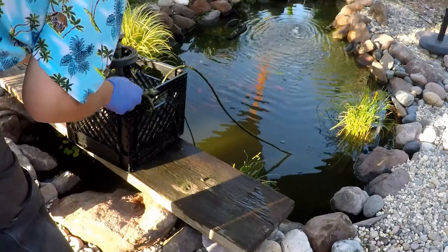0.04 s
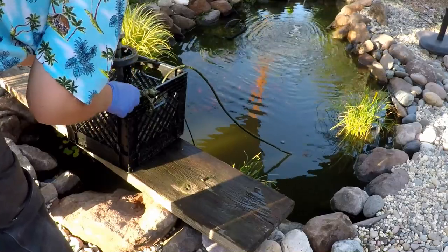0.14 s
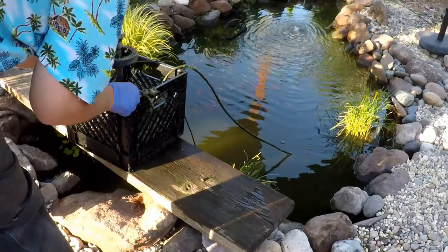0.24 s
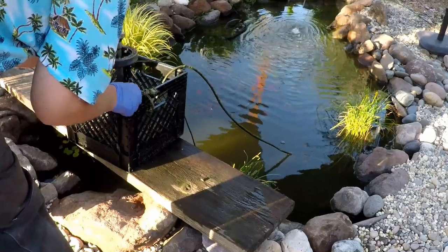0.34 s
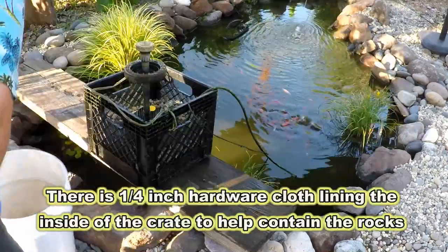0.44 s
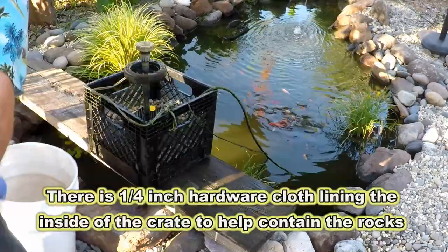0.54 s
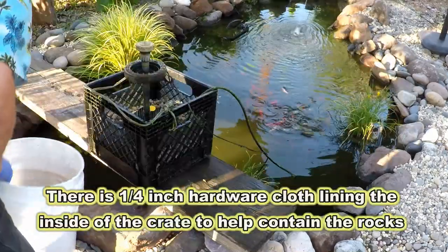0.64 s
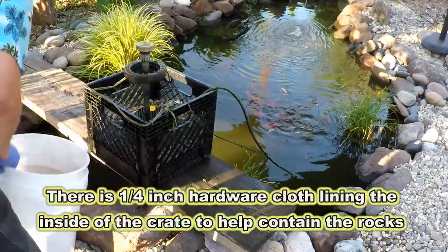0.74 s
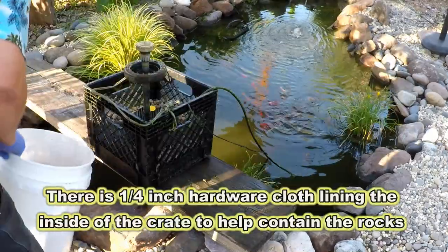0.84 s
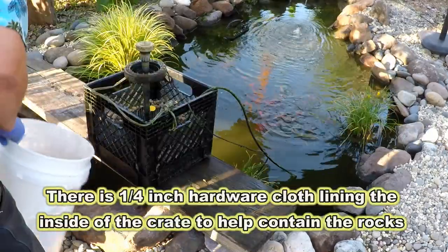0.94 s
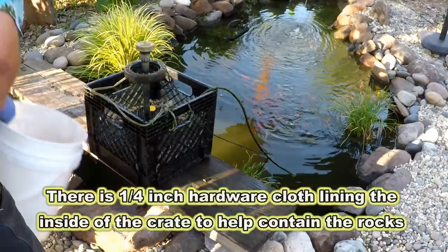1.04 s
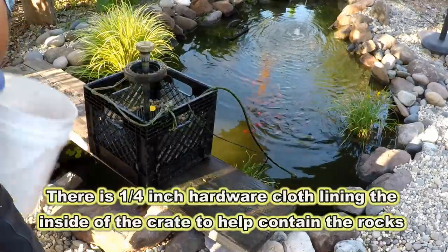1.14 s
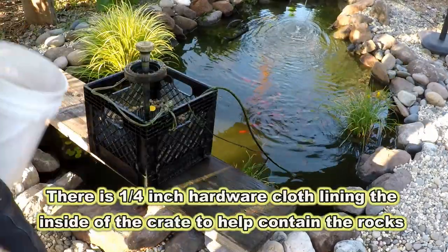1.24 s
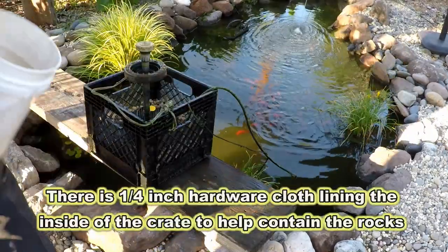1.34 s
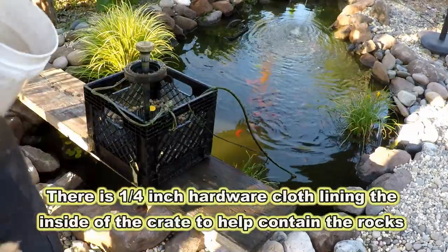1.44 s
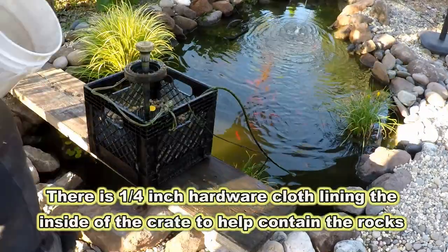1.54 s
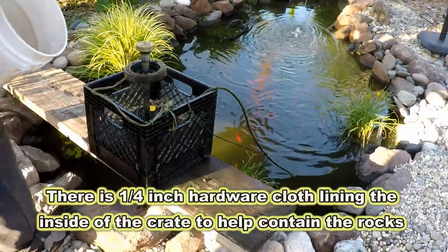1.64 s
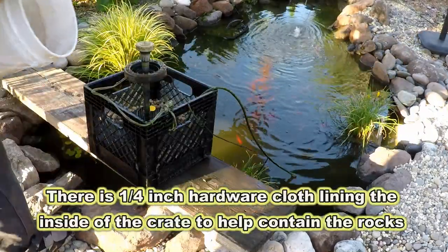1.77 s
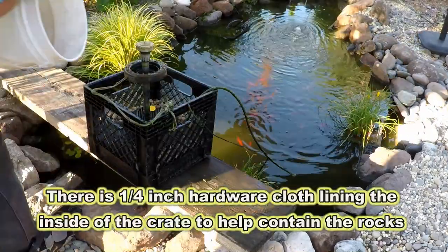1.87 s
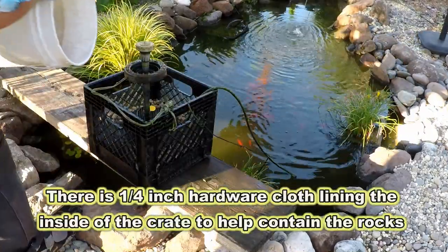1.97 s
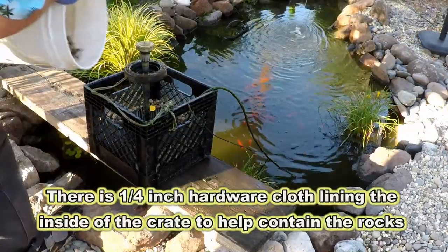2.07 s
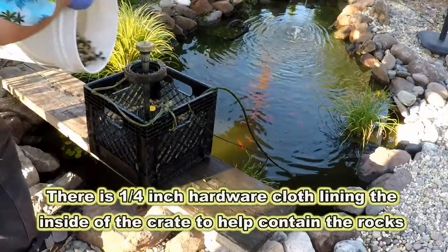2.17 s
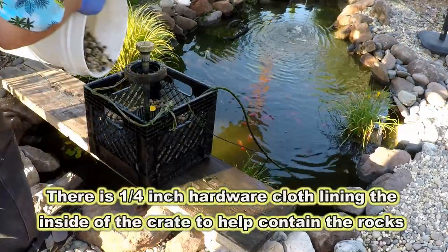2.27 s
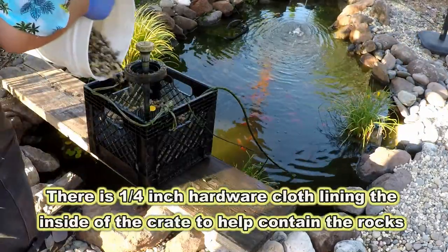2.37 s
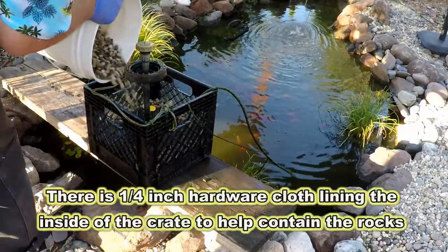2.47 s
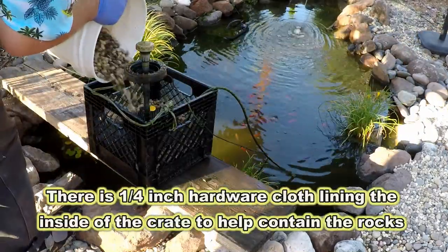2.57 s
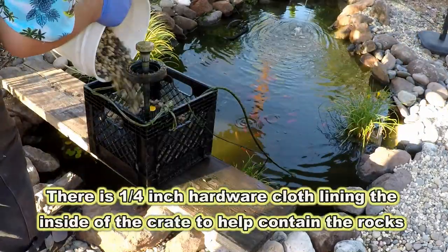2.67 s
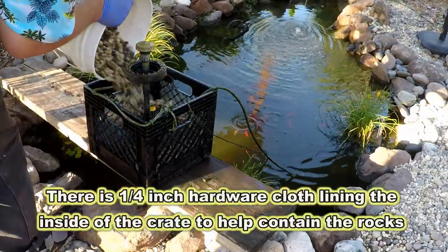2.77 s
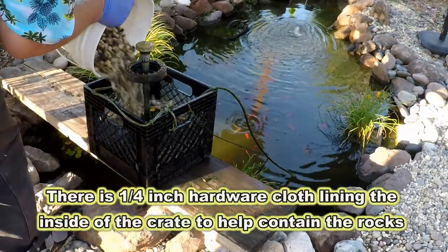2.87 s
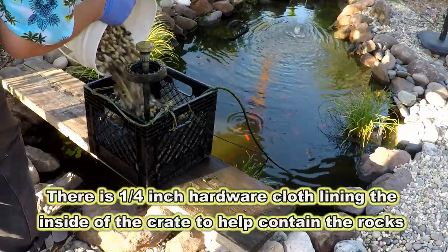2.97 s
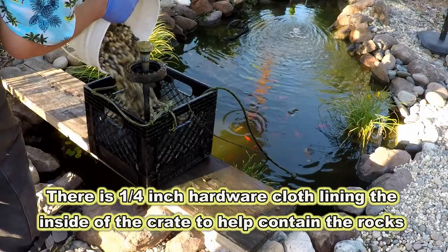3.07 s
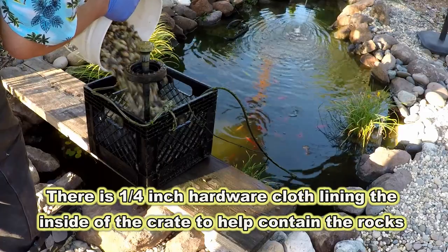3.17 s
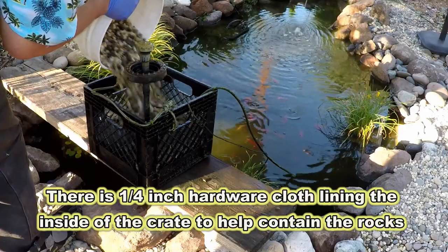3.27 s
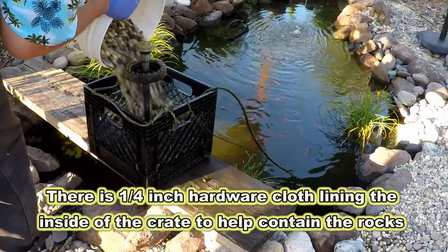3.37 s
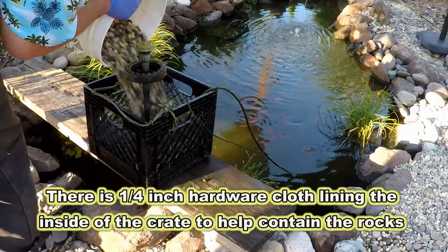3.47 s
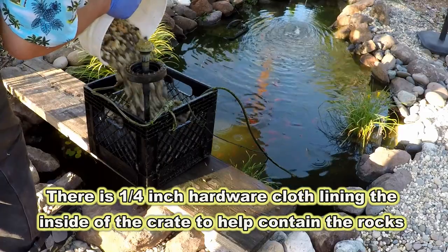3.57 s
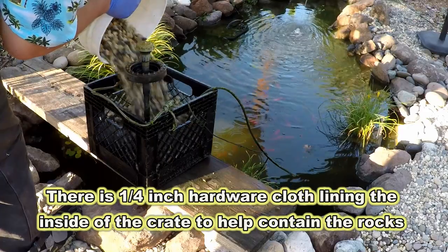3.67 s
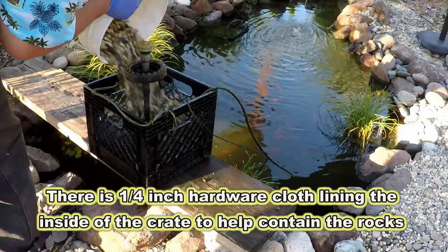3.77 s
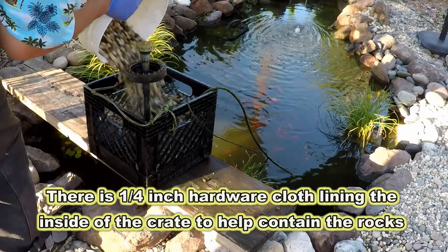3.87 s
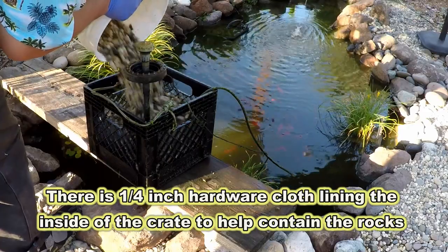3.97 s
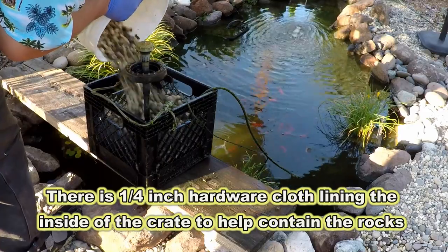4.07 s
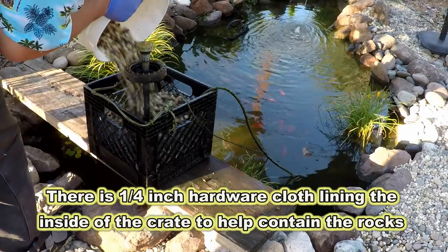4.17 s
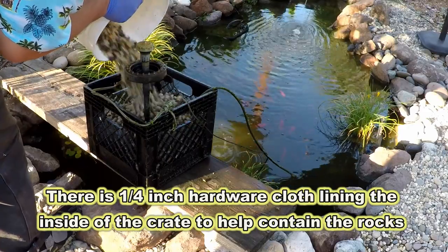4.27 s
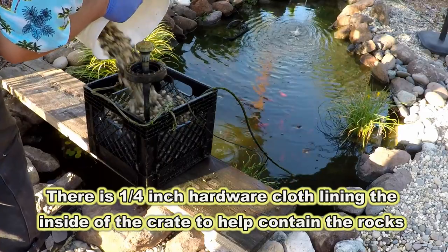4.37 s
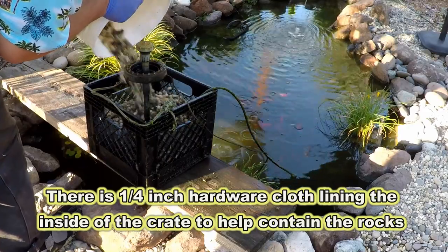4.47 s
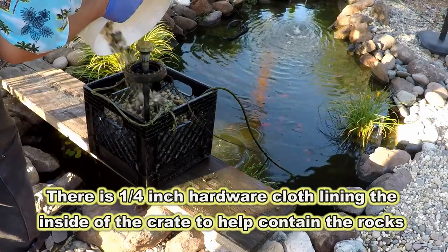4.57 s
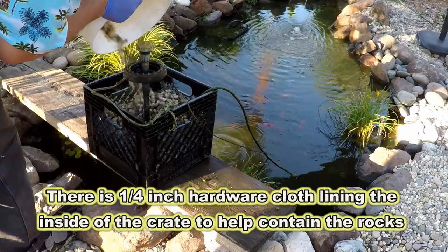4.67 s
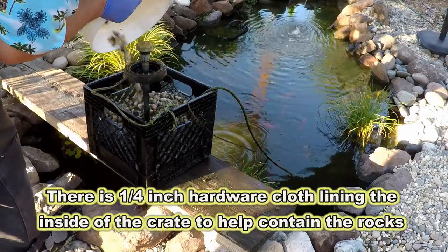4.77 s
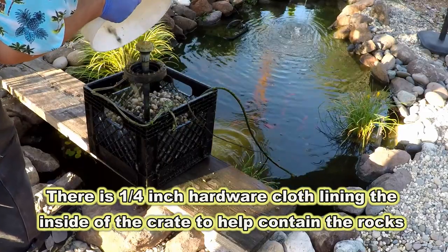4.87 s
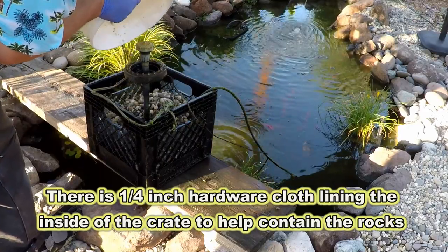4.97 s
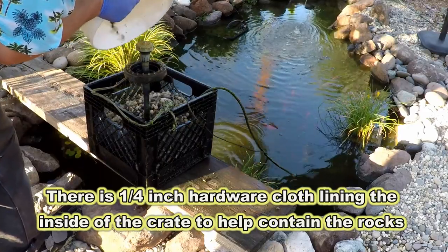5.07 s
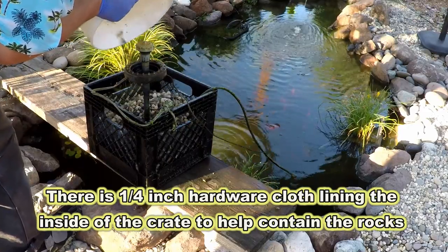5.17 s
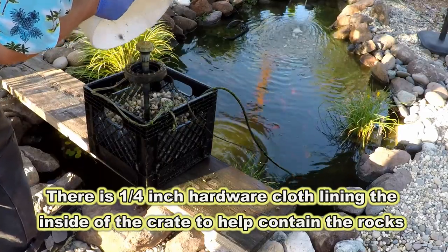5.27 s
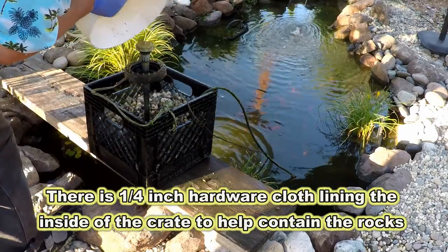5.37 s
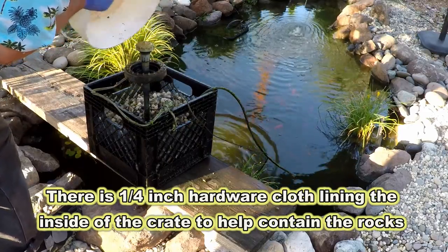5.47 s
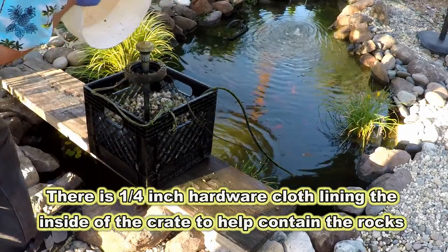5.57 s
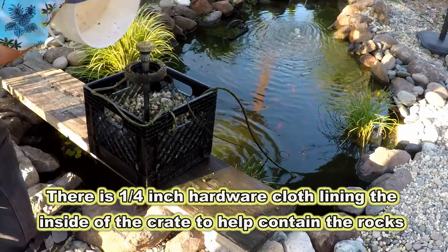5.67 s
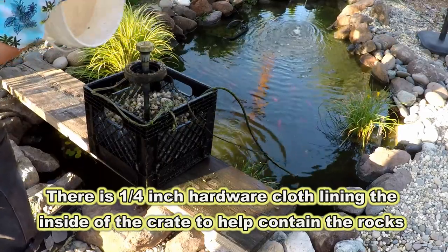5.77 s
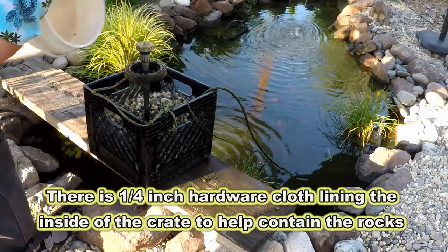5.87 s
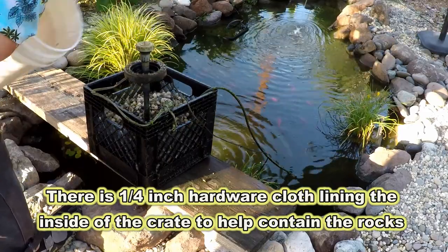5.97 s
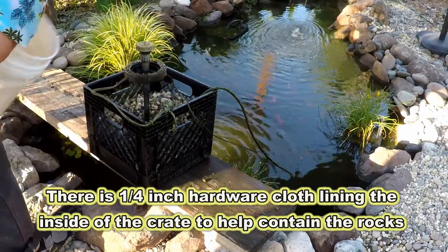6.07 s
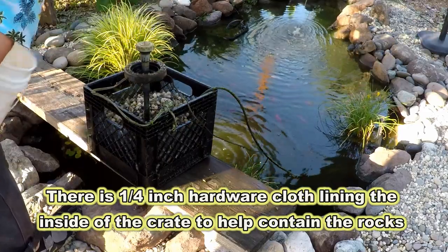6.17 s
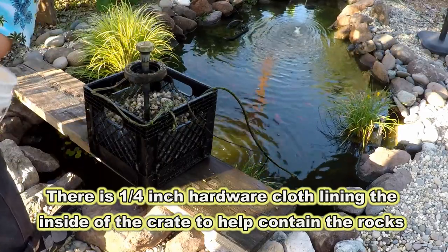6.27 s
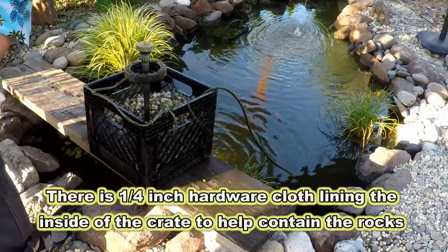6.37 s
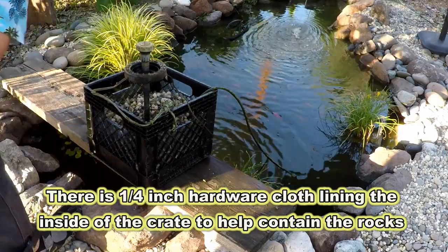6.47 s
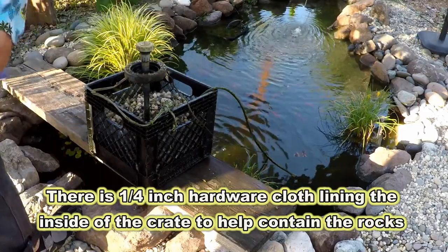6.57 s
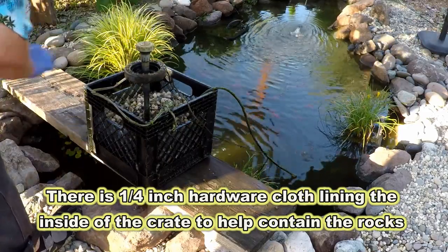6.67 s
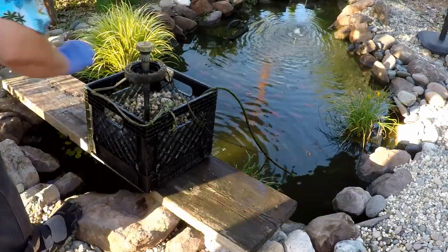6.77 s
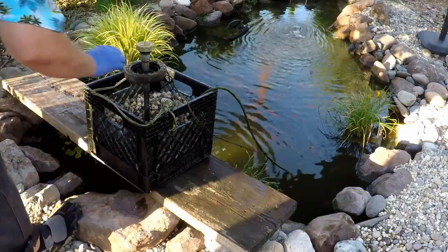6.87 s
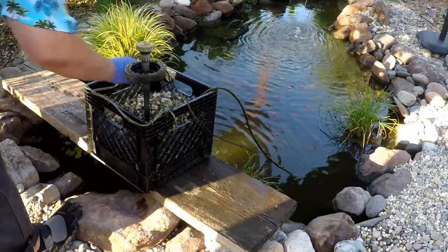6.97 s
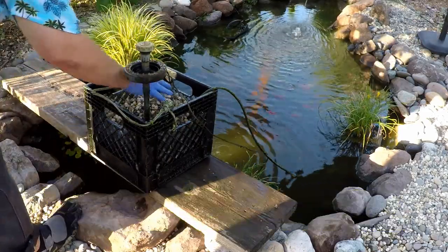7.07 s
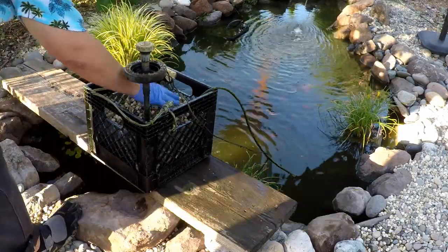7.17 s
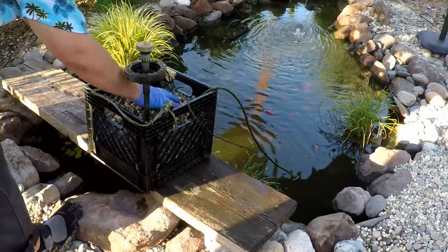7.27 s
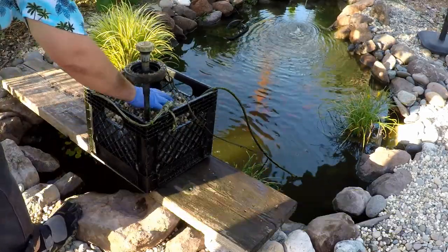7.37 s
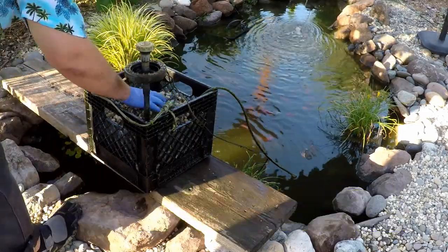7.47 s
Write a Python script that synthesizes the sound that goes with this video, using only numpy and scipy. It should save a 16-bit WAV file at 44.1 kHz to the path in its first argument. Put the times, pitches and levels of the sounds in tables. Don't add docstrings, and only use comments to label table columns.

```python
import sys
import numpy as np
from scipy import signal
from scipy.fft import rfft, irfft, next_fast_len
from scipy.io import wavfile
from scipy.ndimage import uniform_filter1d, map_coordinates

SR = 44100
rng = np.random.default_rng(int(sys.argv[2]) if len(sys.argv) > 2 else 0)


def master(y):
    cut = np.clip(np.atleast_2d(y).T, -1, 1)
    pcm = np.round(cut * 32767)
    wavfile.write(sys.argv[1], SR, pcm.astype(np.int16))


def decibels_to_gain(level_db):
    exponent = np.asarray(level_db, float) / 20
    return 10 ** exponent


N = 332073

# (frequency [Hz], density [dB per Hz])
FOUNTAIN_COLOUR = [(88, -70), (150, -1), (756, 0), (1160, -6.5), (2300, -12), (3390, -9.5), (4910, -10),
                   (8810, -22.5), (12800, -68), (14900, -22), (15800, -47)]
# (frequency [Hz], density [dB per Hz])
RUMBLE_COLOUR = [(15, -12), (25, -0.5), (69, -0.5), (152, -11.5), (184, -17), (291, -16.5), (450, -28),
                 (580, -53), (990, -120)]

# (time [s], clatter level [dB])
FLOW = [(0, -53.5), (.17, -57), (.33, -59), (1.6, -63), (1.75, -59), (1.84, -55.5), (1.98, -33.5),
        (1.984, -25), (2.25, -30.5), (2.52, -34.5), (2.82, -38), (2.86, -30.5), (3.05, -28.5),
        (4.35, -29.5), (4.88, -37.5), (5.14, -50.5), (5.7, -70.5), (7.42, -65), (7.53, -55)]
# (time of the peak [s], peak level [dB], rise [s], t60 [s])
SLIPS = [(.24, -56, 0.092, 0.17), (0.379, -51.5, 0.019, 1.3), (.48, -72, 0.02, 0.58),
         (.57, -53, 0.092, 0.4), (0.656, -48.5, 0.072, 0.047), (.72, -73, 0.0095, 0.094),
         (0.825, -46, .02, 0.17), (.945, -55.5, .008, 0.15), (1.18, -49.5, 0.039, 0.17),
         (1.38, -57, 0.18, 0.096), (1.792, -37, 0.023, 0.34), (1.857, -42, 0.0027, 0.052),
         (2.549, -30.5, 0.015, 0.19), (2.645, -28, 0.0067, 0.19), (2.685, -28.5, 0.0075, 0.14),
         (2.722, -30.5, 0.005, 0.99), (2.83, -24, 0.0036, 0.063), (2.886, -25, 0.0032, 0.068),
         (5.03, -42.5, 0.049, 1.6), (5.176, -45, 0.01, 0.41), (5.292, -43, 0.011, 0.089),
         (5.337, -46, 0.01, 0.19), (5.42, -50, 0.019, 0.33), (5.482, -41.5, 0.0087, 0.45),
         (5.616, -49.5, 0.023, 0.24), (5.75, -56.5, 0.041, 0.17), (5.95, -59, 0.015, 0.13),
         (6.45, -55.5, 0.025, 1.3), (7.47, -56, 0.056, 3.9)]
# (time [s], surface [0 bucket wall, 1 bare crate, 2 bed of gravel])
LANDING = [(0, 1.55), (.7, 1.37), (1.9, 0.19), (2.4, 0.46), (2.6, 0.58), (2.9, 1.09), (3.5, 1.415),
           (4.2, 1.51), (4.7, 1.65), (4.9, 1.54), (5.3, 1.4), (7.53, 1.58)]
# (frequency [Hz], density [dB per Hz])
SURFACE_COLOURS = [
    [(350, -28.5), (600, -9.5), (676, -6.5), (721, -14), (906, -4.5), (1090, -5), (1300, 2), (1810, -3),
     (2110, -7.5), (2500, -7.5), (2850, -8), (3150, -5), (3450, -8), (3900, -12), (7020, -16), (8000, -23),
     (10400, -50), (17600, -120)],
    [(350, -70.5), (600, -16), (916, -8.5), (1080, -10), (1410, -1), (1930, -0.5), (2200, -1.5), (2680, -4),
     (2860, -2), (3710, -7), (4550, -8), (8000, -27.5), (10400, -69), (17600, -120)],
    [(350, -32.5), (600, -24), (977, 1.5), (1200, -6.5), (1310, 5.5), (1570, -13.5), (2200, 2), (2430, 4),
     (3630, 5.5), (6100, -3), (6650, -6), (8000, -15.5), (10400, 3.5), (17600, -120)],
]
# (time [s], level [dB])
FINE_GRIT = [(0, -6), (.35, -5.5), (.46, -6.5), (.7, -11), (.8, -1.5), (1.3, 3), (1.7, 6), (1.81, 5.5),
             (1.87, 8), (2.0, 1), (3.0, 1), (4.2, 3), (5.1, 2), (5.7, -3.5), (6.3, -3.5), (6.9, -4),
             (7.25, -10), (7.45, 1.5)]
# (time [s], fill [0 empty, 1 half, 2 full], level [dB])
CRATE_FILL = [(0, 1.4, 7.5), (1.7, 1.1, 1), (2.0, 0.23, 1), (2.7, 0.41, 3.5), (3.1, 1.23, 2.5),
              (3.6, 1.3, 5.5), (4, 1.2, 2.5), (4.6, 2.2, 1.5), (5.2, 2.2, 1.5), (5.8, 2.95, -3.5),
              (7.53, 2.3, -3)]
# (frequency [Hz], density [dB per Hz])
CRATE_THUDS = [
    [(100, -69), (170, -17.5), (231, 3), (433, -17.5), (609, 5), (715, -12), (900, 0), (1170, -23),
     (1980, -120)],
    [(120, -42), (200, -12), (264, -2), (348, -1.5), (415, 6), (565, 2.5), (900, -3.5), (1170, 8.5),
     (1980, -120)],
]
# (frequency [Hz], density [dB per Hz])
HALF_FULL_THUD = [(120, -51), (200, -9.5), (300, -0.5), (400, -7.5), (520, 1.5), (640, -0.5), (900, -1),
                  (1170, -3.5), (1980, -120)]
# (frequency [Hz], width [Hz], level [dB])
BUCKET_MOUTH = [(1480, 140, -5)]
# (frequency [Hz], width [Hz], level [dB])
SLOPING_WALL = [(3150, 600, -4)]
# (time [s]), (level [dB])
EMPTYING_S, EMPTY_RING_DB = (2.3, 2.8, 4.1, 4.7), (-8, 0, 0, 8)

# (frequency [Hz], density [dB per Hz])
TICK_COLOUR = [(2000, -120), (3530, 0.0), (6000, -2.5), (7230, -5.0), (8470, -12.5), (10500, -1.0),
               (11900, 0.5), (14700, -7.5), (15400, -8)]
# (frequency [Hz], width [Hz], level [dB])
PLASTIC_WALL = [(565, 110, -11), (1000, 345, 6), (1350, 106, 6.5), (1690, 360, 3.5), (3190, 1040, 4.5),
                (3770, 3070, -2.5)]
# (frequency [Hz], width [Hz], level [dB])
BUCKET_HOLLOW = [(217, 130, -13.5), (501, 35, 0), (765, 110, -11.5)]
# (time [s], peak level [dB], pitch [Hz])
RAKED = [(0.019, -36, 2240), (0.061, -35.5, 3380), (0.096, -40, 2160), (0.193, -44, 1350),
         (0.236, -31.5, 3130), (0.288, -39, 2930), (0.373, -42, 3750), (0.464, -33, 1770),
         (0.615, -40, 3460), (0.655, -34, 4470), (0.709, -43, 3420), (.148, -48, 4200), (.247, -35.5, 3700),
         (.438, -40, 1600), (.729, -44, 5900), (1.148, -43, 1500), (1.278, -46, 6000)]
# (time [s], peak level [dB], pitch [Hz])
LIFTED = [(0.755, -28.5, 1460), (0.796, -16, 1140), (0.799, -15.5, 1360), (0.811, -24, 950),
          (0.828, -28, 1710), (0.934, -22, 1490), (0.954, -26.5, 920), (0.989, -26.5, 1290),
          (1.075, -26.5, 1430), (1.075, -34, 2880), (1.429, -25.5, 1430), (1.521, -40, 1320),
          (1.721, -21, 3150), (1.775, -36, 2790), (1.791, -37, 1570), (1.854, -21, 2740),
          (1.873, -24, 1480), (1.899, -20.5, 1560), (1.933, -21.5, 950)]
# (time [s], peak level [dB], pitch [Hz])
ROLLED = [(1.033, -30, 1410), (1.155, -31, 1350), (1.165, -27, 3720), (1.178, -26.5, 1350),
          (1.186, -31, 3030), (1.199, -38, 2600), (1.249, -37, 1310), (1.347, -39, 1470),
          (1.366, -24, 1390), (1.38, -28, 1390), (1.391, -28, 1390), (1.392, -35, 3300), (6.304, -39, 3400),
          (6.312, -32, 1500), (7.166, -37, 920), (7.18, -37, 1690)]
# (time [s], peak level [dB], pitch
# [Hz])
POURED = [(1.982, -18, 2640), (2.503, -14.5, 1890), (2.521, -11, 2180), (2.547, -13.5, 3460),
          (2.552, -15, 1480), (2.569, -13, 1830), (2.598, -12, 1480), (2.626, -12, 1630), (2.64, -17, 1650),
          (2.648, -9, 3340), (2.678, -12.5, 1520), (2.721, -8.5, 1610), (2.757, -10, 3250),
          (2.823, -15, 3400), (2.829, -14, 1390), (2.854, -28, 2340), (2.883, -35, 1540),
          (2.945, -27, 1810), (2.98, -38, 1540), (3.0, -28, 1410), (3.031, -31, 1800), (3.057, -40, 1350),
          (3.131, -1, 1610), (3.244, -6, 1760), (3.928, -6.5, 3440), (4.539, -9, 2020), (4.54, -17.5, 1000),
          (4.753, -16.5, 4370), (4.802, -14, 1690),
          (1.956, -19, 1430), (2.969, -9.5, 2230), (3.1498, -17, 1480), (3.1724, -12.5, 1350),
            (3.286, -15, 2890), (3.6294, -13.5, 1430), (3.6804, -10, 2490), (3.879, -16, 1380),
            (4.0002, -7.5, 3350), (4.0584, -22, 3740), (4.2694, -47, 2200), (4.2904, -12, 4330),
            (4.417, -13, 3530), (4.649, -23, 2390), (4.6694, -25, 1450), (4.7, -18, 3970),
            (4.8318, -18, 3600), (4.8616, -18.5, 1540), (4.8856, -18, 1470), (4.936, -17, 3670),
          (1.9825, -22, 1080), (1.9833, -14, 2740), (2.0242, -14, 1340), (2.1864, -14, 1540),
              (2.2264, -19, 3050), (2.2698, -11, 3030), (2.2876, -17, 3160), (2.338, -22, 1300),
              (2.392, -23, 3150),
          (2.0437, -11, 3100), (2.0805, -9, 1280), (2.105, -7, 3020), (2.1234, -14, 1810),
             (3.2994, -28, 1570), (3.3394, -22, 1560), (3.4287, -12, 2100), (3.48, -14, 1720),
             (3.5188, -12, 2540), (3.569, -18, 1470), (3.7394, -22, 4070), (3.8, -22, 2860),
             (4.1194, -34, 3850), (4.1705, -17, 4500), (4.2206, -9, 3290), (4.3294, -19, 3560),
             (4.3694, -29, 3400), (4.4694, -19, 2810)]
# (time [s], peak level [dB], pitch [Hz], relative tick [dB])
LAST = [(4.991, -25, 3240, -8), (5.01, -26, 4060, 1), (5.037, -46, 1550, -7), (5.049, -28.5, 4280, 4),
        (5.113, -29, 1460, -2), (5.167, -29, 2900, -4), (5.185, -25, 3000, -20), (5.203, -29, 1460, -7),
        (5.247, -28.5, 3100, -8), (5.282, -28, 1490, -19), (5.292, -26.5, 2950, -32),
        (5.297, -23.5, 2900, -33), (5.371, -31.5, 2900, -0.5), (5.405, -34, 3200, -2),
        (5.44, -27, 4350, -8), (5.476, -22.5, 3520, -22), (5.487, -26.5, 2480, -25),
        (5.495, -23, 1590, -28), (5.517, -30.5, 2000, -27), (5.337, -32.5, 1500, -20),
        (5.42, -32, 2900, -18), (5.507, -25, 2200, -27), (5.615, -28, 1350, -24), (5.669, -41, 1550, -9),
        (5.735, -39, 3710, -18), (5.761, -52, 3100, -17), (5.836, -42, 1190, -5)]
# (time [s], peak level [dB], pitch [Hz], relative hollow thud [dB])
EMPTIED = [(5.919, -39, 3500, -24), (5.953, -36, 2400, -25), (6.184, -42.5, 3100, -24),
           (6.271, -47, 3260, -24), (6.3245, -17.5, 1290, -10.5), (6.325, -19.5, 3370, -20),
           (6.33, -29, 1350, -7), (6.339, -22, 1000, -22), (6.35, -22, 2220, -10.5),
           (6.36, -28.5, 1580, -20), (6.41, -42, 1690, -18), (6.451, -49, 3400, -16),
           (6.47, -36.5, 3330, -27), (6.535, -39, 1370, -4.5), (6.618, -46, 3550, -12),
           (6.668, -43, 1480, -19), (6.737, -31.5, 970, -11), (6.759, -44, 1320, -11),
           (6.814, -46.5, 2200, -1), (6.886, -31, 1030, -21), (6.892, -26, 1100, -8),
           (6.96, -31.5, 1600, -3), (6.977, -30, 940, -20), (7.012, -42, 2200, -6),
           (7.048, -34.5, 1490, -10), (7.064, -37, 1680, -11), (7.227, -43, 1620, -6),
           (7.195, -47, 1000, 5), (7.256, -44, 1640, -11), (7.293, -46, 2010, -18)]
# (gain [dB], relative wall knock [dB], relative tick [dB], relative thud [dB], t60 [s])
LOTS = [
    (0.5, -3.5, -47, -16, 0.039),
    (1, 2, -49, -21, 0.033),
    (-5.5, -5, -40, -28, 0.021),
    (1.5, -12, -45, -25, 0.024),
    (-1, 1, -4, -25, 0.022),
    (-3, 1.5, -30.5, 5, 0.062),
]
# (time [s], peak level [dB])
GRIT = [(1.6556, -50), (1.6901, -47), (2.667, -43), (2.7945, -28), (5.15, -48), (5.205, -30),
        (5.228, -31.5), (5.31, -38), (5.457, -33.5), (5.4823, -37), (5.5387, -55), (5.592, -34.5),
        (5.6241, -46), (5.659, -52), (5.707, -48.5), (5.7703, -55),
        (0.1281, -51), (0.2808, -53), (0.3537, -44), (0.5033, -48), (0.5427, -56), (0.6135, -57),
        (0.7962, -27), (0.8979, -52), (0.9284, -53), (0.9363, -54), (1.0395, -51), (1.0959, -50),
        (1.2301, -56), (1.2396, -53), (1.2675, -50), (1.3029, -56), (1.3249, -47), (1.4052, -53),
        (1.4292, -65), (1.4681, -50), (1.502, -53), (1.5344, -55), (1.5978, -54), (1.722, -45),
        (1.7823, -47), (1.8018, -39), (1.8184, -40), (5.7942, -58), (5.8092, -49), (5.85, -50),
        (5.8765, -51), (5.9414, -61), (6.0252, -53), (6.1973, -57), (6.4542, -58), (6.548, -67),
        (6.6388, -66), (7.1625, -68), (7.1886, -63), (7.3257, -51), (7.4066, -59), (7.438, -59),
        (4.858, -28), (4.8993, -26), (4.936, -26), (4.9684, -40), (5.064, -26.5), (5.0904, -25.5),
          (5.1667, -33), (5.287, -41), (5.291, -43), (5.3677, -30), (5.4161, -52), (5.4271, -46),
          (5.4392, -31), (5.5564, -56)]
# (frequency [Hz], t60 [s])
YARD_DECAY = [(300, 0.33), (2000, 0.37), (10000, 0.034)]

# (time [s], peak level [dB], relative upper modes [dB], lowest mode [Hz])
BOUNCES = [
    (6.893, -38.5, 2, 197),
    (6.976, -19.5, 0, 170),
    (7.024, -22.5, -8, 199),
    (7.184, -34, -5, 225),
    (7.254, -22.5, 3.5, 193),
    (7.292, -30, 4, 174),
    (7.314, -25.5, -10, 198),
    (7.331, -32, 1, 205),
    (7.373, -39, -8, 200),
]
# (frequency [Hz], level [dB], t60 [s])
DRUM_MODES = [(319, 11, 0.044), (375, 3.5, 0.075), (458, -10, 0.066), (710, -1.5, 0.038),
              (1030, 0.5, 0.027)]
# (start [s], end [s])
DULLED = [(7.012, 7.038), (7.268, 7.294)]


def unit(x):
    return x / np.sqrt(np.mean(x ** 2) + 1e-20)


def along(points, hz):
    f, v = np.transpose(points)
    return np.interp(np.log(hz + 1), np.log(f + 1), v)


def curves(rows):
    s, *cols = np.transpose(rows)
    return [np.interp(np.arange(N) / SR, s, c) for c in cols]


def wobble(rate):
    knots = rng.standard_normal(int(N * rate / SR) + 4)
    return map_coordinates(knots, [np.arange(N) * rate / SR])


def filtered(x, response):
    m = next_fast_len(N + SR // 2)
    return irfft(rfft(x, m) * response(np.fft.rfftfreq(m, 1 / SR)), m)[..., :N]


def resonances(modes):
    def response(f):
        total = 0
        for k, (hz, width, db) in enumerate(modes):
            damping = 1j * f * width
            total = total + (-1) ** k * decibels_to_gain(db) * damping / (hz * hz - f * f + damping)
        return total
    return response


def coloured(x, spectrum):
    size = 8192
    gain = decibels_to_gain(along(spectrum, np.fft.rfftfreq(size, 1 / SR)))
    cepstrum = irfft(np.log(gain + 1e-6))
    cepstrum[1:size // 2] *= 2
    cepstrum[size // 2 + 1:] = 0
    return signal.fftconvolve(x, irfft(np.exp(rfft(cepstrum))))[:N]


def blend(x, spectra, position):
    return sum(np.clip(1 - abs(position - k), 0, 1) * unit(coloured(x, c)) for k, c in enumerate(spectra))


def arrivals(rate, spread_db):
    chance, size, sign = rng.random((3, N))
    strength = decibels_to_gain(-spread_db * np.log(size + 1e-4))
    return (chance < rate / SR) * strength * np.sign(sign - .5) / np.sqrt(rate)


def pebbles(rate, spread_db, cycles, count):
    out, t = np.zeros(N), np.arange(800) / SR
    for hz in np.geomspace(550, 8000, count):
        ring = hz * np.sin(2 * np.pi * hz * t) * np.exp(-t * hz / max(cycles, .3))
        out += signal.oaconvolve(arrivals(rate / count, spread_db), ring)[:N]
    return out


def outdoors():
    fountain_db, early_db, early_ends_s, early_fade_s = -64.5, 10, 0.455, 0.087
    hiss = unit(coloured(rng.standard_normal(N), FOUNTAIN_COLOUR)) * decibels_to_gain(1.5 * wobble(13))
    bubbles = pebbles(np.full(N, 160.), spread_db=2.2, cycles=6, count=14)
    bubbles = unit(coloured(bubbles, FOUNTAIN_COLOUR))
    early = np.clip(1 - (np.arange(N) / SR - early_ends_s) / early_fade_s, 0, 1)
    rumble_db = -54.5 + early_db * early + .9 * wobble(7)
    rumble = unit(coloured(rng.standard_normal(N), RUMBLE_COLOUR)) * decibels_to_gain(rumble_db)
    return decibels_to_gain(fountain_db) * (hiss + decibels_to_gain(-4.0) * bubbles) + rumble


def flow_level():
    power, t = decibels_to_gain(2 * curves(FLOW)[0]), np.arange(N) / SR
    for s, db, rise, t60 in SLIPS:
        decay = decibels_to_gain(2 * (db - 60 * np.maximum(t - s, 0) / max(t60, .02)))
        power = power + decay * np.clip(1 + (t - s) / max(rise, .002), 0, 1) ** 2
    return 10 * np.log10(power)


def stone_clatter(rate, landing, db):
    big_per_s, big_db = 400, -11
    t = np.arange(N) / SR
    rattle = rng.standard_normal(90) * decibels_to_gain(-.25 * np.arange(90))
    big = arrivals(np.full(N, big_per_s), spread_db=2.2)
    big = unit(np.convolve(big, rattle)[:N]) * decibels_to_gain(big_db)
    small = unit(pebbles(rate, spread_db=1.2, cycles=3, count=18))
    clatter = blend(small + big, SURFACE_COLOURS, landing)
    mouth_gain = decibels_to_gain(np.interp(t, EMPTYING_S, EMPTY_RING_DB) * (db > -56))
    clatter = clatter + mouth_gain * filtered(clatter, resonances(BUCKET_MOUTH))
    sliding = np.interp(t, (2.35, 2.6), [1, 0]) * (t > EMPTYING_S[0] - .5)
    return clatter + sliding * filtered(clatter, resonances(SLOPING_WALL))


def crate_thud(rate):
    fill, fill_db = curves(CRATE_FILL)
    colours = [CRATE_THUDS[0], HALF_FULL_THUD, CRATE_THUDS[1]]
    return decibels_to_gain(fill_db) * blend(arrivals(rate / 2, spread_db=2.5), colours, np.clip(fill, 0, 2))


def stream():
    db = flow_level()
    landing = np.clip(curves(LANDING)[0], 0, 2)
    tick_db = -16.5 + 8 * landing + 0.024 * (db + 19.5)
    tick_db = tick_db + curves(FINE_GRIT)[0] + 0.048 * wobble(27.3)
    thud_db = -47 + 0.61 * (db + 26.0) - db
    rate = np.clip(6000 * decibels_to_gain(0.41 * (db + 30.5)), 300, 20000)
    clump_db = (0.14 * wobble(14) + 0.71 * wobble(45)) * (6000 / rate) ** 1.4
    clatter = stone_clatter(rate, landing, db)
    ticks = unit(coloured(arrivals(2 * rate, spread_db=2.5), TICK_COLOUR))
    return decibels_to_gain(db + clump_db) * (clatter + decibels_to_gain(tick_db) * ticks + decibels_to_gain(thud_db) * crate_thud(rate))


def stone_rows():
    harder_is_brighter = 0.21
    poured = POURED
    lots = [[(*row, 0, 0) for row in lot] for lot in (RAKED, LIFTED, poured, ROLLED)]
    lots.append([(*row, 0) for row in LAST])
    lots.append([(s, db, hz, -hollow_db - 13, hollow_db) for s, db, hz, hollow_db in EMPTIED])
    rows = []
    for lot, (gain_db, lot_knock_db, lot_tick_db, lot_thud_db, t60) in zip(lots, LOTS):
        for s, db, hz, bright_db, hollow_db in lot:
            knock_db = lot_knock_db + harder_is_brighter * (db + 13.5)
            tick_db = lot_tick_db + bright_db + harder_is_brighter * (db + 23)
            rows.append((s, db + gain_db, hz, knock_db, tick_db, lot_thud_db + hollow_db, t60))
    return rows


def stones():
    ring, knock, tick, thud = np.zeros((4, N + SR))
    t = np.arange(SR // 16) / SR
    rows = stone_rows()
    draws = rng.standard_normal((len(rows), 3, len(t)))
    draws[:, :, 12] += 8
    for (s, db, hz, knock_db, tick_db, thud_db, t60), (a, b, c) in zip(rows, draws):
        start = round((s - .0004) * SR)
        at = slice(start, start + len(t))
        fade = decibels_to_gain(db - 60 * t / max(t60, .004)) * (1 - np.exp(-t / 0.0006))
        band = signal.iirpeak(hz, 4.4, SR)
        ring[at] += signal.lfilter(*band, signal.lfilter(*band, fade * a)) * np.sqrt(SR / hz)
        knock[at] += decibels_to_gain(knock_db) * fade * b
        tick[at] += decibels_to_gain(tick_db) * fade * decibels_to_gain(-60 * t / 0.015) * b
        thud[at] += decibels_to_gain(thud_db) * fade * c
    for s, db in GRIT:
        tick[round(s * SR):][:len(t)] += decibels_to_gain(db - 12.5 - 60 * t / 0.045) * rng.standard_normal(len(t))

    def lowpass(f, hz):
        return 1 / (1 + 1j * f / hz - (f / hz) ** 2)

    def soft_wall(f):
        return resonances(PLASTIC_WALL)(f) * lowpass(f, 7000) ** 3

    rings = decibels_to_gain(-6.0) * filtered(ring[:N], lambda f: lowpass(f, 8000) ** 2)
    knocks = decibels_to_gain(-3.5) * filtered(knock[:N], soft_wall)
    ticks = decibels_to_gain(9.0) * coloured(tick, TICK_COLOUR)
    thuds = decibels_to_gain(18.5) * filtered(thud[:N], resonances(BUCKET_HOLLOW))
    return rings + knocks + ticks + thuds


def yard(x):
    hz, t, z = signal.stft(rng.standard_normal(SR // 3), SR, nperseg=256)
    fade = decibels_to_gain(-60 * t / along(YARD_DECAY, hz)[:, None])
    tail = signal.istft(z * fade, SR, nperseg=256)[1]
    return signal.fftconvolve(np.pad(x, (200, 0)), tail / np.linalg.norm(tail))[:N]


def bucket():
    boom_db, boom_t60_s, choke_t60_s = 6.5, 0.16, 0.031
    sag, sag_s = .05, .012
    out, t = np.zeros(N + SR), np.arange(SR // 2) / SR
    next_times = [row[0] for row in BOUNCES[1:]] + [np.inf]
    for (s, db, upper_db, low_hz), next_s in zip(BOUNCES, next_times):
        modes = np.zeros(len(t))
        for hz, level, t60 in DRUM_MODES:
            modes += decibels_to_gain(level + upper_db - 60 * t / t60) * np.sin(2 * np.pi * hz * t)
        bent_t = t + sag * sag_s * (1 - np.exp(-t / sag_s))
        modes += decibels_to_gain(boom_db - 60 * t / boom_t60_s) * np.sin(2 * np.pi * low_hz * bent_t)
        choke = decibels_to_gain(-60 * np.maximum(t - (next_s - s), 0) / choke_t60_s)
        out[round(s * SR):][:len(t)] += decibels_to_gain(db - 11.0) * modes * choke * (1 - np.exp(-t / 0.0046))
    return out[:N]


def scene():
    air, flow = outdoors(), stream()
    hits = stones() + bucket()
    echoes = decibels_to_gain(-17) * yard(hits)
    return np.tile(flow + hits + echoes + air, (2, 1))


def limit_band(x):
    top_hz, sudden_db, dulled_above_hz = 15300, 9, 7700
    top = filtered(x, lambda hz: hz > top_hz)
    jump = abs(uniform_filter1d(x ** 2, size=128)) / abs(uniform_filter1d(x ** 2, size=4096))
    sudden = 1. * (jump > decibels_to_gain(2 * sudden_db))
    sudden = uniform_filter1d(uniform_filter1d(sudden, size=256), size=256)
    x = x - top * (1 - decibels_to_gain(-14) * sudden)
    t = np.arange(N) / SR
    dulled = uniform_filter1d(sum(1. * (t > a) * (t < b) for a, b in DULLED), size=200)
    return x - dulled * filtered(x, lambda hz: hz > dulled_above_hz)


def roll_off(x):
    return signal.sosfilt(signal.butter(12, 16460, fs=SR, output="sos"), x)


def record(dry):
    mid = limit_band(dry[0])
    loudness = np.sqrt(abs(uniform_filter1d(mid ** 2, size=1024))) / decibels_to_gain(-28)
    loudness = np.minimum(loudness, 1)
    drift = decibels_to_gain(-33.5 + 6.9 * wobble(22)) * loudness ** 1.06
    side = drift * (np.roll(mid, 37) + np.roll(mid, 90) / 2) - decibels_to_gain(-33) * loudness * mid
    return roll_off(np.array([mid + side, mid - side]))


dry = scene()
out = record(dry)
master(out)
```